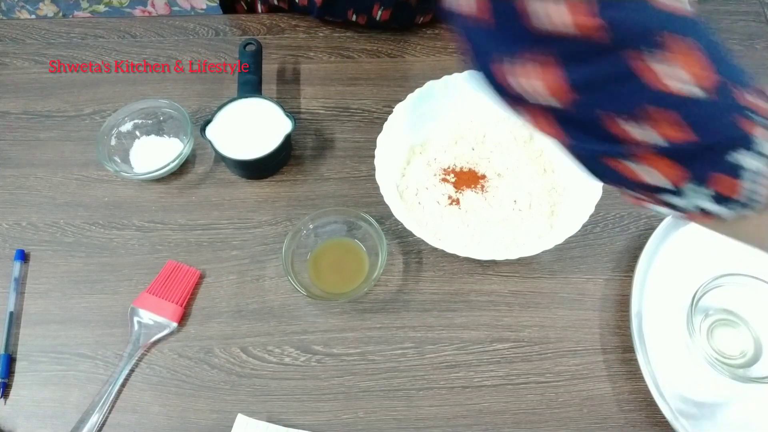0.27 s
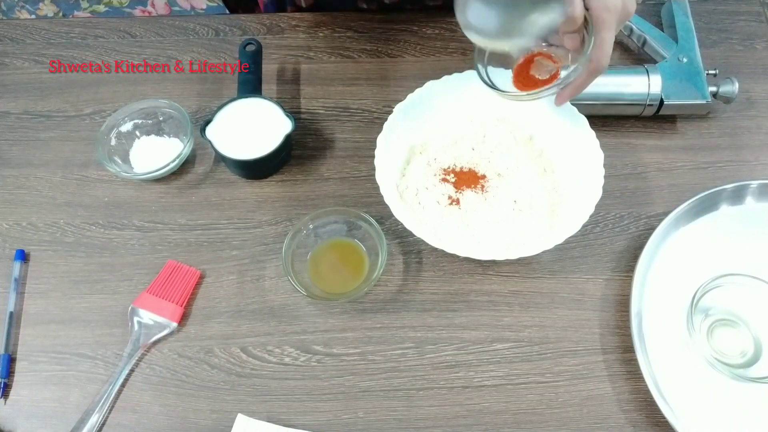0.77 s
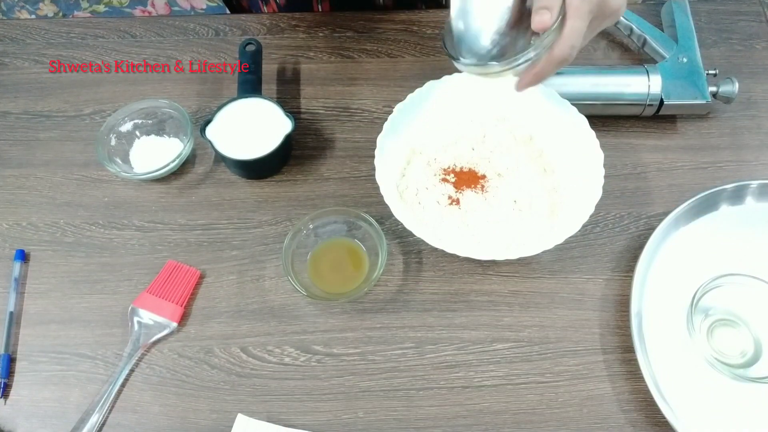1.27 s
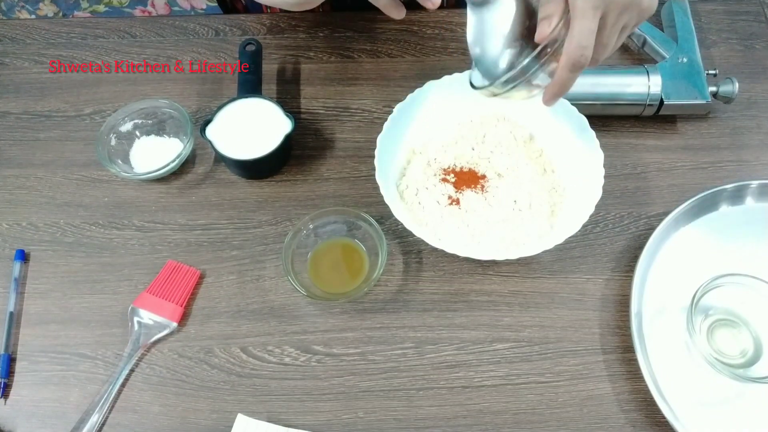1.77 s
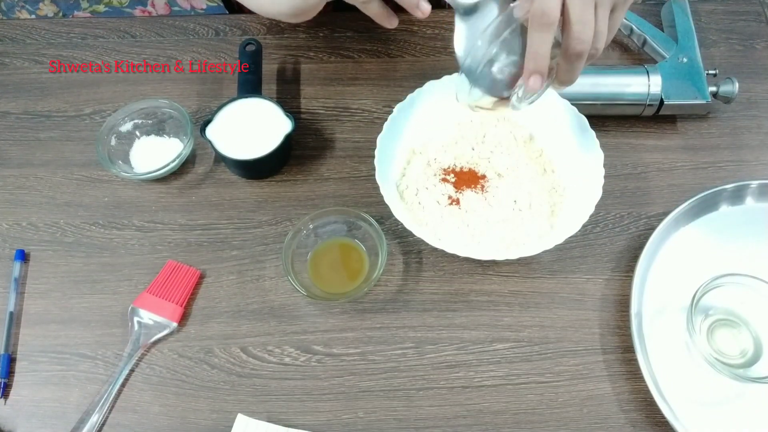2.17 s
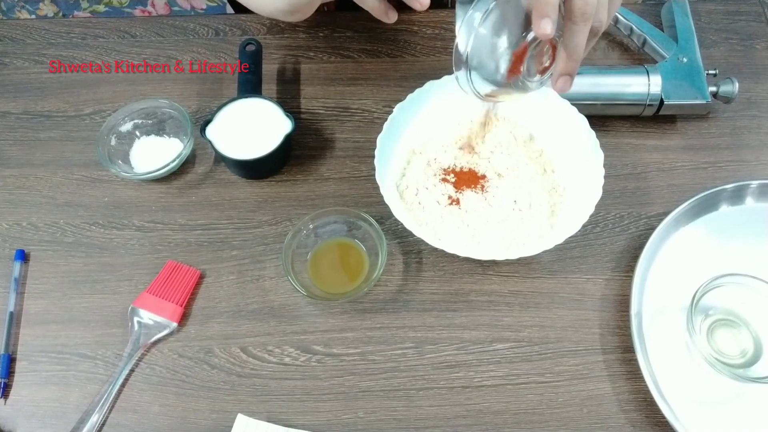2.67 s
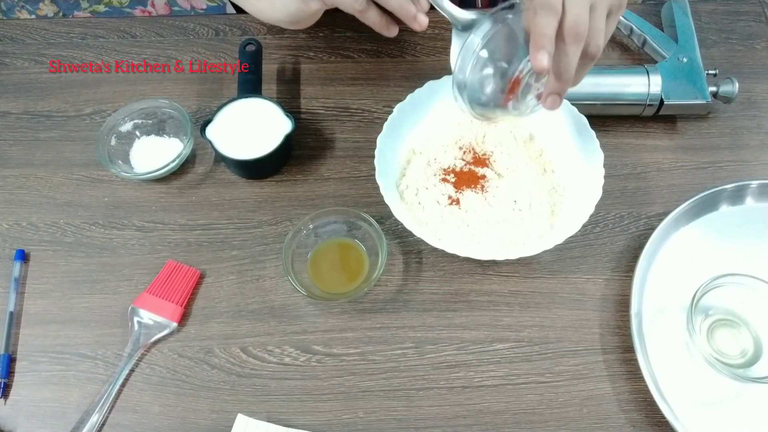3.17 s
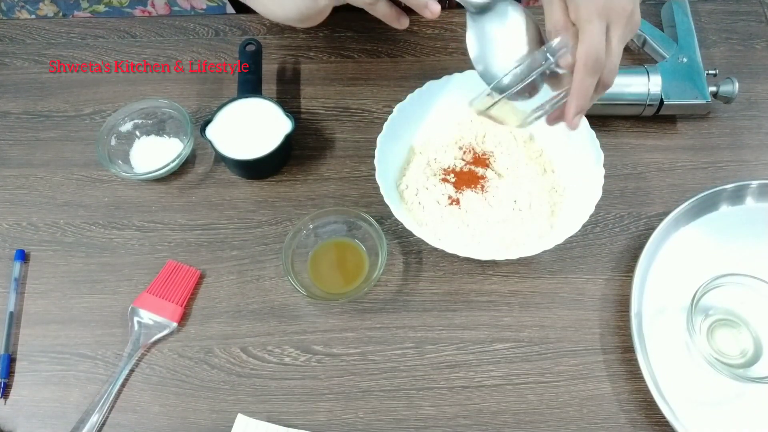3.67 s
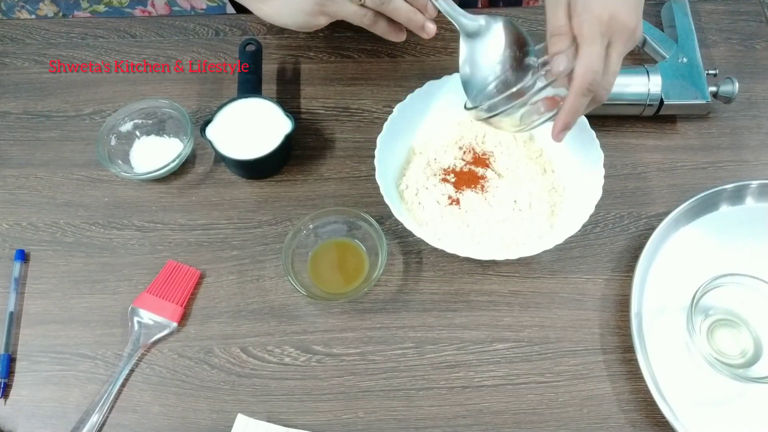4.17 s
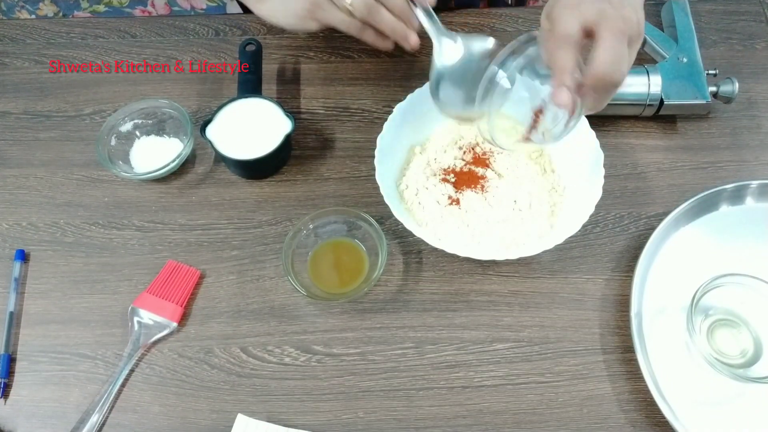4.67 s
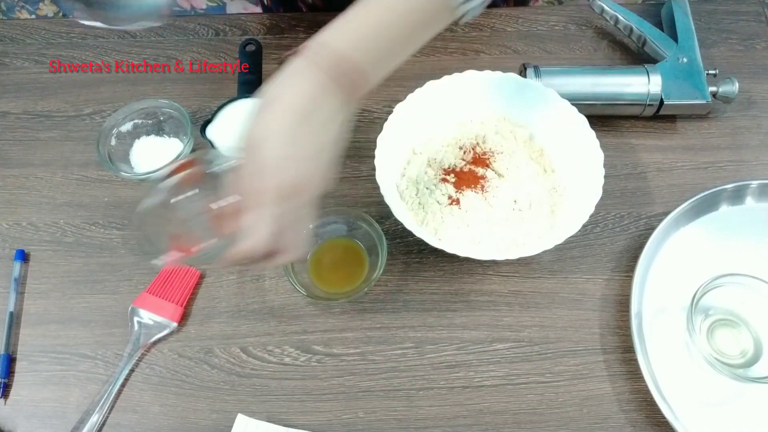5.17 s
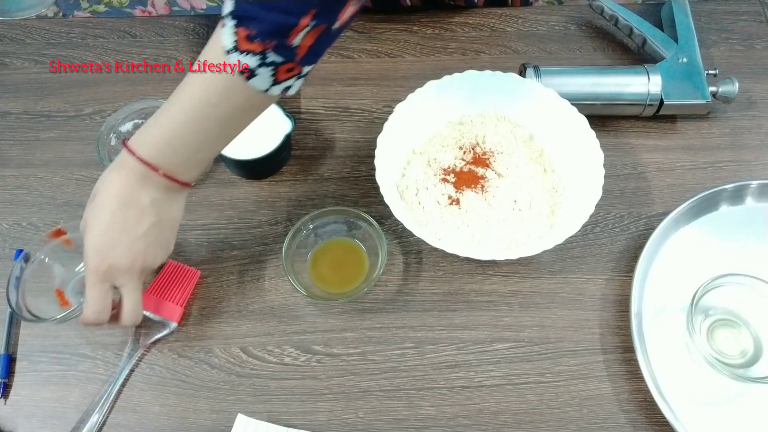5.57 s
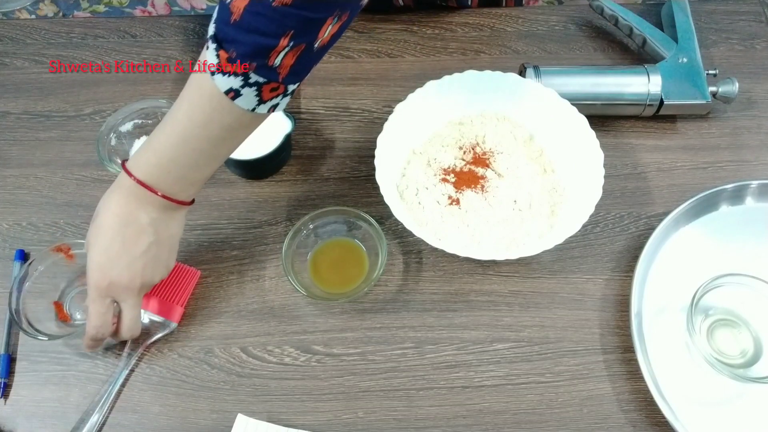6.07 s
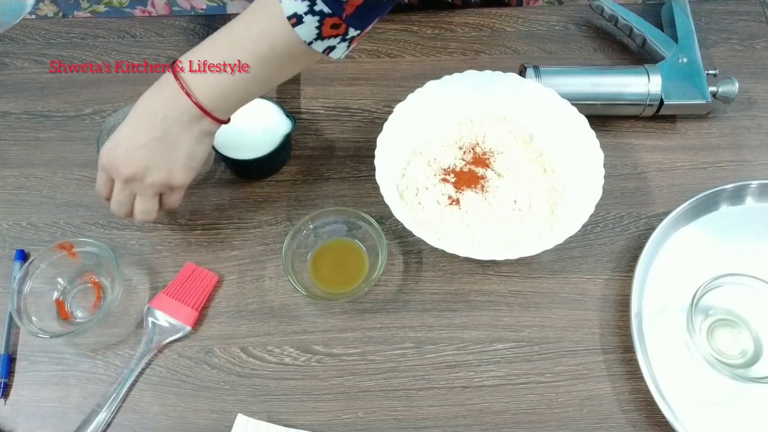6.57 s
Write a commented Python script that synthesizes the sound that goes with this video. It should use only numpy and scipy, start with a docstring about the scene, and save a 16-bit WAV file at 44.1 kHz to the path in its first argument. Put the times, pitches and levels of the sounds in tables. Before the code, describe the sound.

Bright damped clinks of steel on glass in a small hard kitchen, a soft whoosh of air and sleeve, then dishes knock and slide on wood.

```python
"""A steel spoon scrapes and knocks spice out of a small hand-held glass bowl: sharp damped clinks, dull nudges.
Then an arm sweeps past the microphone as swelling, ebbing noise: low air, then a rustling sleeve.
The bowl is set down on a wooden table, slides with a low rasp, and another dish is bumped.
Blows ring damped modes under a noisy crack; strokes are uneven grains of noise that hiss, ring and rasp.
A small hard kitchen answers blows and strokes throughout, over a low, nearly steady room noise."""
import sys
import numpy as np
from scipy import signal
from scipy.fft import rfft, irfft
from scipy.io import wavfile
from scipy.ndimage import uniform_filter1d

SR = 44100
rng = np.random.default_rng(int(sys.argv[2]) if len(sys.argv) > 2 else 0)


def bounce(signal):
    """Save signal as a 16-bit WAV file at the path given by the first command-line argument."""
    frames = np.transpose(np.atleast_2d(signal))
    limited = np.clip(frames, -1, 1)
    pcm = np.round(limited * 32767).astype(np.int16)
    wavfile.write(sys.argv[1], SR, pcm)


N = 300144  # samples

# Steel on bare glass: [t/s, level/dB, brightness/dB per octave, contact cut-off f/Hz, rim tone level/dB,
# ping level/dB, rim f/Hz, ring time/factor, chatter t/s, room send level/dB]
CLINK_EVENTS = [(0.098, -47, 5, 16000, -5, 0.5, 1990, 3.1, .01, -13.5),
                (0.7707, -51.5, -3.5, 5500, -4, -4.5, 2130, 0.32, 0.00094, -5),
                (1.1523, -28.5, -0.84, 13000, 2.5, 5.5, 2107, 0.75, .0022, -12),
                (1.206, -44, -1, 12100, 4.5, 3, 2140, 0.99, .002, -22),
                (1.3504, -33.5, -0.96, 12500, 13, 0.5, 2147, 1, 0.0022, -16),
                (1.657, -35, -0.8, 14700, 4.5, -2, 1986, 0.7, .0018, -12.5),
                (2.1141, -32.5, 0.5, 10800, 1, 2, 2110, 0.88, .002, -11.5),
                (2.5808, -30, 0.36, 14980, 1, 0, 2150, 0.95, .0035, -13),
                (2.731, -44, -2, 3500, 1, 3, 2140, 0.69, .0017, -11),
                (2.8091, -29.5, 1.8, 13800, 1, 1, 2136, 0.5, .0066, -11.5),
                (2.9862, -25.5, 0, 13240, -0.5, -0.5, 2256, 0.99, .006, -13.5),
                (3.094, -30.5, 4, 17000, -10, -6, 2130, 1.1, .001, -13),
                (3.1132, -42, -1.5, 16080, 2.5, 7, 2120, 0.31, .002, -4.5),
                (3.1302, -38.5, 0.5, 14980, -1, 0.5, 2140, 0.43, .002, -12),
                (3.267, -26.5, 0.83, 11300, 0, -0.5, 2080, .9, .003, -10.5),
                (4.1046, -36, -1.5, 8400, 8, 7.5, 2090, 0.73, 0.003, -12),
                (4.2918, -32, 4.5, 7400, 1.5, -0.5, 2030, 0.17, 0.00026, -10.5)]
# Dull nudges of the spoon, cushioned by spice: [t/s, level/dB, brightness/dB per octave]
NUDGE_EVENTS = [(1.6437, -39.5, -5.5), (1.8667, -55, -5.5), (2.3877, -51.5, -7.5), (2.7114, -45, -5.5),
                (3.8373, -53.5, -11.5), (4.0655, -64, -9), (4.709, -69.5, -0.5)]
# All nudges share one touch
NUDGE_CUTOFF_HZ, NUDGE_RIM_DB, NUDGE_PING_DB, NUDGE_RIM_HZ = 12000, -3.5, -3.5, 2130
NUDGE_RING_FACTOR, NUDGE_CHATTER_S, NUDGE_ROOM_DB = 0.97, 0.0026, -13.5


def spoon():
    """Clinks and dull nudges in the hand-held bowl, heard directly and through the room."""
    direct, sent = np.zeros((2, N))
    nudge_touch = (NUDGE_CUTOFF_HZ, NUDGE_RIM_DB, NUDGE_PING_DB, NUDGE_RIM_HZ,
                   NUDGE_RING_FACTOR, NUDGE_CHATTER_S, NUDGE_ROOM_DB)
    nudges = [(*row, *nudge_touch) for row in NUDGE_EVENTS]
    for start_s, *touch, room_db in CLINK_EVENTS + nudges:
        sound = clink(*touch)
        add(direct, start_s, sound)
        add(sent, start_s, amp(room_db) * sound)
    return direct + kitchen(sent, early_db=3.0)


# Edges of the bands that shape a clink: [f/Hz]
CLINK_EDGES_HZ = [250, 900, 1700, 2600, 4400, 5500, 7600, 10000, 16000]
# How bowl and spoon radiate in each of those bands: [level/dB]
CLINK_RADIATION_DB = [-9.5, -1, -1.5, -1.5, -1.5, -3.5, 2.5, -4.5]
# Modes of bowl and spoon besides the rim tone, nominal: [f/Hz, level/dB, t60/s]
GLASS_MODES = [(794, -8, 0.011), (1181, 1, 0.028), (1406, -1.5, 0.025), (2270, -21.5, 0.013),
               (3610, -12, 0.02), (4040, -11.5, 0.0256), (4167, -14, 0.022), (4707, -7, 0.043),
               (5090, -16, .045), (6070, -10, 0.0715), (5920, -18.5, 0.018), (7550, -2.5, .035),
               (7850, -14, 0.044), (8100, 3, 0.046), (8433, 1, 0.07), (9430, -5, 0.046),
               (10600, -15, 0.055), (11280, -7.5, 0.044), (12400, -13, 0.046), (13100, -17, .045),
               (13920, -12, .045), (15430, -26.5, .05)]
CLINK_PIVOT_HZ = 2000  # brightness tilts about here
PING_HZ, PING_WIDTH_HZ = 4700, 200  # width to either side
CRACK_DB, CRACK_DB_PER_S, CRACK_PER_TONE = 4, 801, -0.28  # base, per s of chatter, per dB of rim and ping


def clink(db, tilt_db, cutoff_hz, rim_db, ping_db, rim_hz, ring_factor, chatter_s,
          steepness=8, rim_split_hz=90):
    """One touch on the glass; the spot that is hit favours the paired rim tone or the high ping."""
    hz = middles(CLINK_EDGES_HZ)
    levels = db + np.array(CLINK_RADIATION_DB) + tilt_db * np.log2(hz / CLINK_PIVOT_HZ)
    levels -= 10 * np.log10(1 + (hz / cutoff_hz) ** steepness)
    levels[np.digitize([rim_hz, PING_HZ], CLINK_EDGES_HZ) - 1] += [rim_db, ping_db]
    # The ping is favoured among its neighbouring modes as well as in its band
    modes = []
    for f, mode_db, t60 in GLASS_MODES:
        near_ping = abs(f - PING_HZ) < PING_WIDTH_HZ
        modes.append((f, mode_db + ping_db * near_ping, t60))
    modes += [(rim_hz, 0, .042), (rim_hz - rim_split_hz, -4.5, .036)]
    crack_db = CRACK_DB + CRACK_DB_PER_S * chatter_s + CRACK_PER_TONE * (rim_db + ping_db)
    return blow(modes, ring_factor, chatter_s, CLINK_EDGES_HZ, levels, crack_db,
                crack_t60=0.012, rattle_db=-8.5, spread_db=2.5, rise_s=.0008)


# Dishes on the table: [t/s, level/dB, brightness/dB per octave, ring time/factor, chatter t/s,
# room send level/dB]
KNOCK_EVENTS = [(5.8154, -16.5, 2.26, 0.95, 0.0033, -6), (5.838, -29.5, 0.5, .89, 0.0047, -6),
                (6.047, -37, -4.5, .8, .007, -1), (6.0698, -32, -4.5, 0.73, 0.0093, -5.5),
                (6.1721, -27.5, 0, 0.34, 0.00071, -5.5), (6.247, -46, 7, .5, 0.0037, 2.5),
                (6.323, -48, -8, 0.89, 0.0035, -11), (6.5809, -31.5, 0.5, 0.84, 0.021, -8.5),
                (6.595, -34, -3.5, 1, 0.0017, -10)]
# Edges of the bands that shape a knock: [f/Hz]
KNOCK_EDGES_HZ = [150, 380, 750, 1500, 3000, 6000, 16000]
# How the table radiates in each of those bands: [level/dB]
KNOCK_RADIATION_DB = [-7, 1, -5, -19.5, -32, -43.5]
# Modes of the table top, nominal: [f/Hz, level/dB, t60/s]
TABLE_MODES = [(236.7, -8, 0.15), (306, -12, 0.14), (414, -7.5, 0.046), (483, -10, 0.091),
               (535, -3.5, 0.052), (635, -5, 0.031), (795, -4.5, 0.026), (902, -5.5, 0.086),
               (1058, -2, 0.12), (1260, -19, 0.041), (1570, -29, 0.019)]
KNOCK_PIVOT_HZ = 550  # brightness tilts about here
KNOCK_ROOM_TOP_HZ = 3240


def table():
    """Glass meets wood: a noisy thud with short board modes fills the room; the top of its tick stays dry."""
    direct, sent = np.zeros((2, N))
    octaves = np.log2(middles(KNOCK_EDGES_HZ) / KNOCK_PIVOT_HZ)
    for start_s, db, tilt_db, ring_factor, chatter_s, room_db in KNOCK_EVENTS:
        levels = db + np.array(KNOCK_RADIATION_DB) + tilt_db * octaves
        thud = blow(TABLE_MODES, ring_factor, chatter_s, KNOCK_EDGES_HZ, levels, crack_db=19.0,
                    crack_t60=0.011, rattle_db=-16.5, spread_db=-0.5, rise_s=0.00048)
        add(direct, start_s, thud)
        add(sent, start_s, amp(room_db) * thud)
    return direct + kitchen(band(sent, 49, KNOCK_ROOM_TOP_HZ, order=2), early_db=-0.5)


BASS_CUT_HZ = 160


def blow(modes, ring_factor, chatter_s, edges, levels, crack_db, crack_t60, rattle_db, spread_db, rise_s):
    """A contact rings the modes; the surfaces chatter briefly and give a dense, fast crack."""
    t = np.arange(8192) / SR
    touches, noise = rng.standard_normal((2, len(t)))
    touching = rng.random(len(t)) < 1500 / SR  # about 1500 small touches per second
    force = amp(rattle_db) * touches * touching * np.exp(-t / chatter_s)
    force[0] = 1  # the first contact
    tones = signal.fftconvolve(force, ring(modes, t, ring_factor, spread_db, 0.003))[:len(t)]
    crack = noise * amp(crack_db - 60 * t / (crack_t60 + 5 * chatter_s))
    onset = 1 - np.exp(-t / rise_s)
    body = (tones + band(crack, 290, 11000, order=2)) * onset
    # The bass of every blow is cut away below about 160 Hz
    return band(driven(body, edges, np.array(levels)), BASS_CUT_HZ, 15500, order=3)


def ring(modes, t, ring_factor, spread_db, detune):
    """Dying modes; the point of contact and the grip change their weights and pitch a little."""
    hz, db, t60 = np.transpose(modes)[:, :, None]
    weight, shift, side = rng.standard_normal((3, len(modes), 1))
    gain = np.sign(side) * amp(db + spread_db * weight - 60 * t / (t60 * ring_factor))
    tones = gain * np.sin(2 * np.pi * hz * (1 + detune * shift) * t)
    return tones.sum(0)


def driven(body, edges, levels):
    """Smooth causal colour: where and how hard a blow lands sets each band's energy, as its level over 20 ms."""
    hz, db = np.fft.rfftfreq(len(body), 1 / SR), np.zeros(len(levels))
    z, centres = rfft(body), middles(edges)
    which = np.digitize(hz, edges)
    for _ in range(4):  # bands overlap through the smooth curve, so approach the levels in steps
        curve = read(np.transpose([centres, db]), hz)
        energy = np.bincount(which, abs(z * amp(curve)) ** 2)[1:-1] * 2 / len(body)
        db = db + levels - 10 * np.log10(energy / (SR / 50))
    # Minimum phase, so nothing sounds ahead of the contact
    log_gain = np.log(amp(np.r_[curve, curve[-2:0:-1]]))
    phase = -signal.hilbert(log_gain).imag[:len(hz)]
    return irfft(z * amp(curve) * np.exp(1j * phase))


# The spoon scrapes the glass; level is scaled further by the pressure of the stroke:
# [start t/s, peak t/s, end t/s, level/dB, rasp level over hiss/dB, rasp f/Hz]
SCRAPE_EVENTS = [(-.04, .054, 0.087, -47, -9, 372), (.066, 0.09, .15, -37, -16, 724),
                 (0.377, 0.484, 0.48, -58, -7, 873), (1.307, 1.328, 1.39, -58.5, 15, 1150),
                 (1.384, 1.423, 1.47, -51.5, 5.5, 1390), (1.74, 1.808, 1.88, -55.5, -1.5, 1360)]
# The bowl slides on the wood, level as above: [start t/s, peak t/s, end t/s, level/dB, rasp f/Hz]
SLIDE_EVENTS = [(5.98, 6.073, 6.1, -60.5, 420), (6.139, 6.173, 6.2, -47, 595),
                (6.2, 6.252, 6.315, -46, 986)]
SCRAPE_STEEL_DB = -2.5  # ring over hiss
SLIDE_STEEL_DB, SLIDE_RASP_DB = -16, 13  # ring and rasp over hiss


def scrapes():
    """The spoon's strokes ring brightly; the bowl's slides on wood mostly rasp."""
    out = np.zeros(N)
    for start, peak, end, db, rasp_db, rasp_hz in SCRAPE_EVENTS:
        add(out, start, stroke(start, peak, end, db, SCRAPE_STEEL_DB, rasp_db, rasp_hz))
    for start, peak, end, db, rasp_hz in SLIDE_EVENTS:
        add(out, start, stroke(start, peak, end, db, SLIDE_STEEL_DB, SLIDE_RASP_DB, rasp_hz))
    return out


# What rings under a stroke, nominal: [f/Hz, level/dB, t60/s]
STEEL_MODES = [(1926, -11, 0.071), (3920, 1.5, 0.04), (4700, -33, 0.041), (6400, 2, 0.028),
               (6870, 3, 0.029), (8370, -9, 0.2), (9000, -6, 0.13), (10960, -2, 0.035), (12800, 3, 0.018)]
# Spectrum of the hiss of the grains: [f/Hz, level/dB per Hz]
GRIT_SPECTRUM = [(40, -50), (150, -4), (500, 8), (1400, -4.5), (4000, 1), (6500, -2), (9000, -8),
                 (13000, -28), (16000, -4.5)]


def stroke(start, peak, end, db, steel_db, rasp_db, rasp_hz, grain=0.64, rasp_width=0.22):
    """Stick and slip: uneven grains hiss, ring the steel and rasp in one low resonance."""
    now, t = np.arange(start, end, 1 / SR), np.arange(SR // 6) / SR
    pressure = np.interp(now, [start, peak, end], [0, 1, 0])
    noise = rng.standard_normal(len(now))
    unevenness = evened(uniform_filter1d(rng.standard_normal(len(now)), 40))
    slips = evened(noise * np.exp(grain * unevenness))
    drive = np.pad(pressure * slips, (0, len(t)))  # leaves time to ring out
    steel = ring(STEEL_MODES, t, 1, 1, .002)
    hiss = coloured(drive, GRIT_SPECTRUM)
    sing = evened(signal.fftconvolve(drive, steel)[:len(drive)])
    rasp = evened(band(drive, rasp_hz / (1 + rasp_width), rasp_hz * (1 + rasp_width), order=3))
    return amp(db) * drive.std() * (hiss + amp(steel_db) * sing + amp(rasp_db) * rasp)


# Spectrum of the air pushed by the arm: [f/Hz, level/dB per Hz]
PUFF_SPECTRUM = [(30, -52), (70, -32), (110, -19), (160, -5), (230, 3.5), (310, -7), (420, -22.5),
                 (900, -47.5), (3000, -83.5)]
# Spectrum of the rustling sleeve: [f/Hz, level/dB per Hz]
SLEEVE_SPECTRUM = [(50, -45.5), (150, 5), (420, 6), (1000, -2.5), (2200, -9), (4400, -14), (7000, -17.5),
                   (10000, -27.5), (15000, -37.5)]
# Air and sleeve each swell to a peak and ebb as the arm slows; levels are those at the peak
PUFF_PEAK_S, PUFF_DB, PUFF_RISE_DB_PER_S, PUFF_EBB_DB_PER_S = 5.02, -37, 148, 29.5
SLEEVE_PEAK_S, SLEEVE_DB, SLEEVE_RISE_DB_PER_S, SLEEVE_EBB_DB_PER_S = 5.208, -47, 61, 20


def arm(crinkle=0.18):
    """The arm pushes air over the microphone and its sleeve rustles."""
    air, cloth, folds = rng.standard_normal((3, N))
    cloth = cloth * np.exp(crinkle * evened(uniform_filter1d(folds, 200)))
    puff_gain = amp(PUFF_DB) * sweep(PUFF_PEAK_S, PUFF_RISE_DB_PER_S, PUFF_EBB_DB_PER_S)
    puff = puff_gain * coloured(air, PUFF_SPECTRUM)
    rustle_gain = amp(SLEEVE_DB) * sweep(SLEEVE_PEAK_S, SLEEVE_RISE_DB_PER_S, SLEEVE_EBB_DB_PER_S)
    rustle = rustle_gain * coloured(cloth, SLEEVE_SPECTRUM)
    return puff + rustle


ARM_REST_S, ARM_STOP_DB_PER_S = 5.8, 117  # the stop adds to the ebb


def sweep(peak_s, rise_db_per_s, ebb_db_per_s):
    """Gain of one arm movement: a quick swell, a slower ebb, then a fast fade as the arm rests."""
    t = np.arange(N) / SR
    below_db = np.maximum(rise_db_per_s * (peak_s - t), ebb_db_per_s * (t - peak_s))
    stop_db = ARM_STOP_DB_PER_S * np.maximum(t - ARM_REST_S, 0)
    return amp(-below_db - stop_db)


# Nearby surfaces: [delay t/s, strength before the early level]
NEAR_ECHOES = [(.0031, 0.162), (0.011, 0.289), (0.0138, -0.25), (.0152, 0.23), (0.018, .12),
               (0.021, -0.149)]
# Decay of the tail: [f/Hz, t60/s]
TAIL_T60 = [(200, 0.73), (600, 0.54), (2000, 0.63), (4500, 0.57), (8400, 0.51), (12000, 0.31),
            (16000, 0.196)]
# Colour of the tail: [f/Hz, level/dB]
TAIL_COLOUR = [(150, -4.5), (450, -2), (1100, -3), (2100, 3), (4700, -0.5), (8400, -3), (10500, -3),
               (13000, -3), (16000, -12)]


def kitchen(x, early_db, build_s=0.0061):
    """What the room returns: a few near reflections, then a dense tail that dies fastest in the treble."""
    t = np.arange(SR * 4 // 5) / SR
    taps = rng.standard_normal(len(t)) * (rng.random(len(t)) < 6000 / SR)
    hz, when, z = signal.stft(evened(taps), SR, nperseg=256)
    decay_db = 60 * when / read(TAIL_T60, hz)[:, None]
    z = z * amp(read(TAIL_COLOUR, hz)[:, None] - decay_db)
    build_up = 1 - np.exp(-(t / build_s) ** 2)
    tail = signal.istft(z, SR, nperseg=256)[1][:len(t)] * build_up
    response = tail / np.linalg.norm(tail)
    for delay, strength in NEAR_ECHOES:
        response[round(delay * SR)] += amp(early_db) * strength
    return signal.fftconvolve(x, response)[:N]


# Spectrum of the room noise: [f/Hz, level/dB per Hz]
FLOOR_SPECTRUM = [(18, -76), (30, -40.5), (95, -35.5), (215, -4), (374, -13.5), (404, -12.5), (486, -16),
                  (844, -20.5), (1130, -23), (1220, -25.5), (1430, -24.5), (1590, -25.5), (1860, -29),
                  (3580, -32.5), (16000, -41.5)]
ROOM_NOISE_DB = -54


def room_noise(waver_db=0.22):
    """A low, slightly wavering drone under faint hiss."""
    waver = evened(uniform_filter1d(uniform_filter1d(rng.standard_normal(N), 5000), 5000))
    return amp(ROOM_NOISE_DB + waver_db * waver) * coloured(rng.standard_normal(N), FLOOR_SPECTRUM)


def amp(db):
    """Decibels to gain."""
    return 10 ** (np.asarray(db) / 20)


def evened(x):
    """Scales to an rms of one."""
    return x / np.sqrt(np.mean(x ** 2) + 1e-20)


def read(points, hz):
    """Reads a table on a log-frequency axis."""
    f, value = np.transpose(points)
    return np.interp(np.log(hz + 1), np.log(f + 1), value)


def coloured(x, spectrum):
    """Filters x by a spectrum, at an rms of one."""
    gain = amp(read(spectrum, np.fft.rfftfreq(len(x), 1 / SR)))
    return evened(irfft(rfft(x) * gain, len(x)))


def band(x, lo_hz, hi_hz, order=4):
    """Causal band-pass."""
    return signal.sosfilt(signal.butter(order, [lo_hz, hi_hz], "band", fs=SR, output="sos"), x)


def middles(edges):
    """Centre frequencies of bands."""
    return np.sqrt(np.multiply(edges[:-1], edges[1:]))


def add(mix, start_s, sound):
    """Mixes a sound in at a time, cutting off what lies outside the mix."""
    at = round(start_s * SR)
    sound = sound[max(-at, 0):]
    part = mix[max(at, 0):][:len(sound)]
    part += sound[:len(part)]


def scene():
    """All sources meet at one small microphone; only a trace of hiss differs between the channels."""
    rubbing = scrapes()
    rubbing_room = amp(-7.5) * kitchen(rubbing, early_db=8)
    mix = spoon() + table() + rubbing + rubbing_room + arm() + room_noise()
    side = amp(-84.0) * evened(band(rng.standard_normal(N), 5000, 15000))
    return np.array([mix + side, mix - side])


EDGE_HZ = 15950


def record(dry):
    """The recorder's band limit: a steep low-pass without delay."""
    low_pass = signal.firwin(255, EDGE_HZ, window=("kaiser", 9), fs=SR)
    return signal.oaconvolve(dry, low_pass[None], "same")


dry = scene()
out = record(dry)
bounce(out)
```